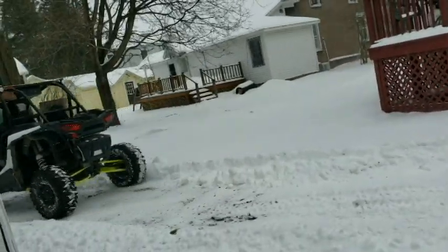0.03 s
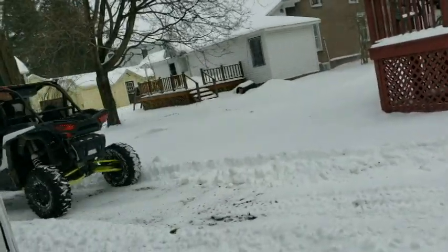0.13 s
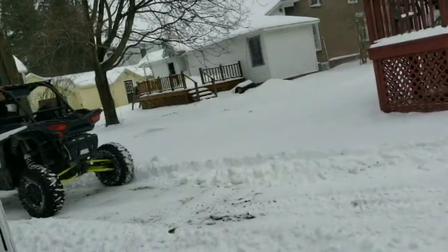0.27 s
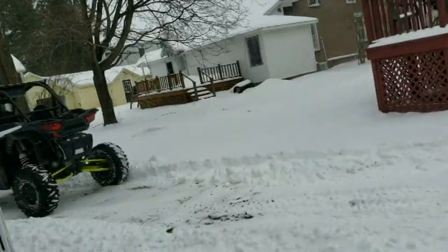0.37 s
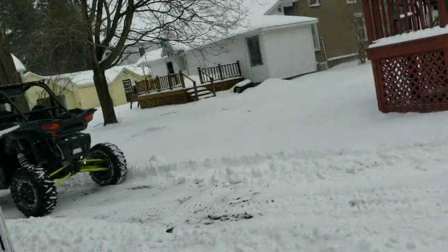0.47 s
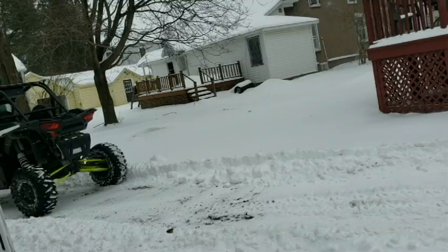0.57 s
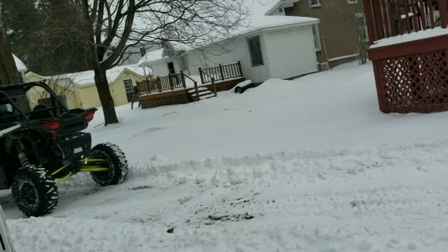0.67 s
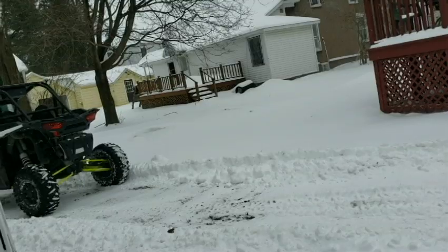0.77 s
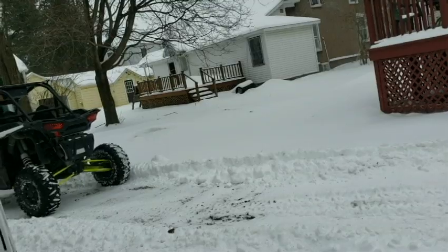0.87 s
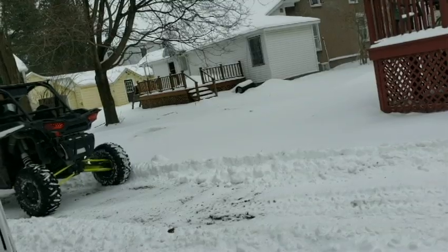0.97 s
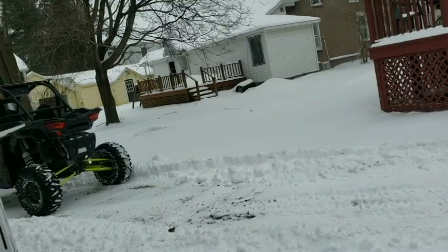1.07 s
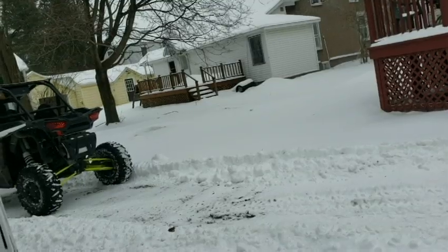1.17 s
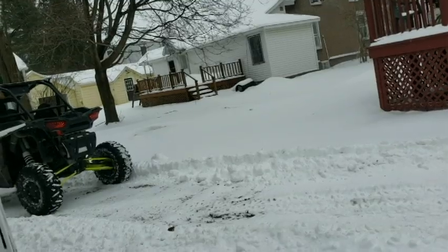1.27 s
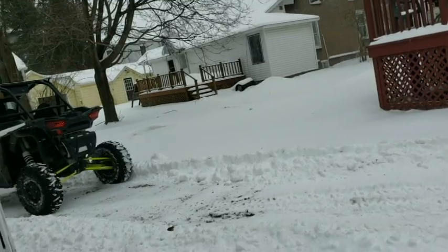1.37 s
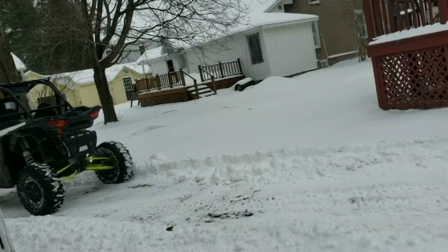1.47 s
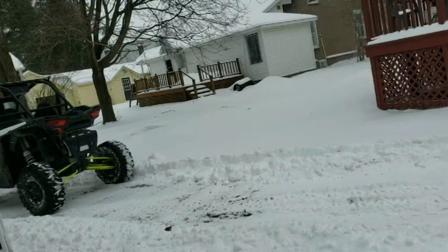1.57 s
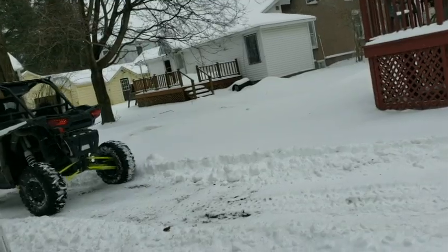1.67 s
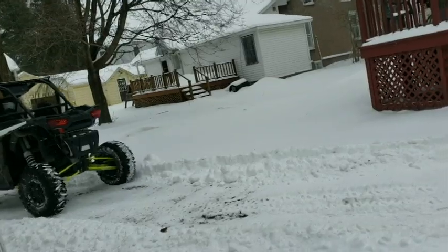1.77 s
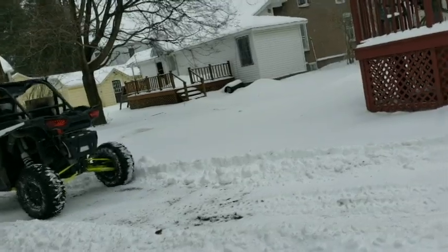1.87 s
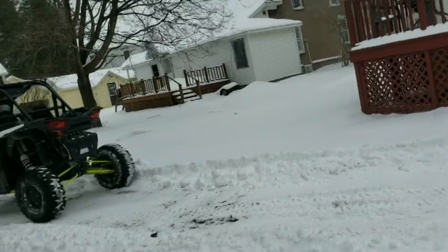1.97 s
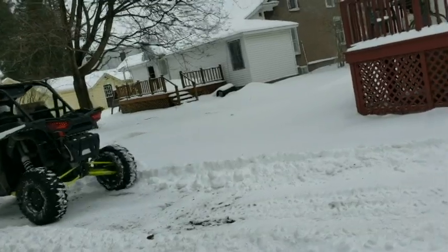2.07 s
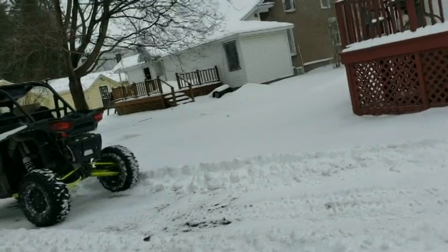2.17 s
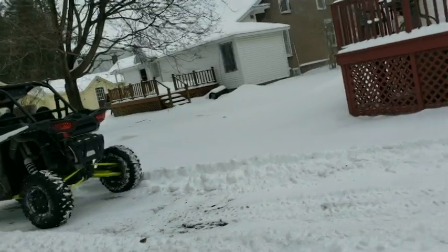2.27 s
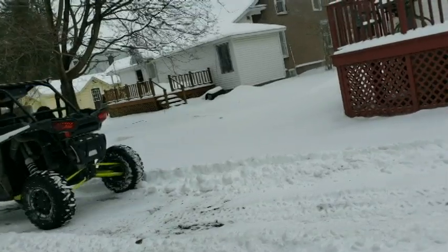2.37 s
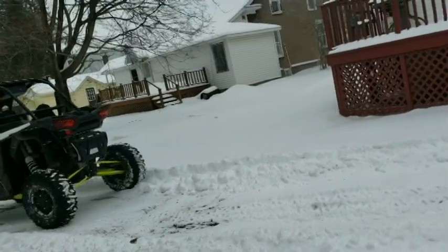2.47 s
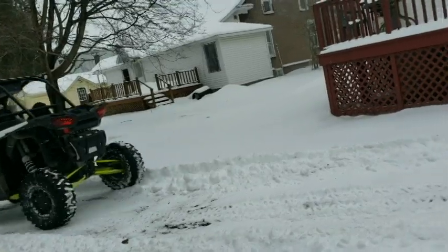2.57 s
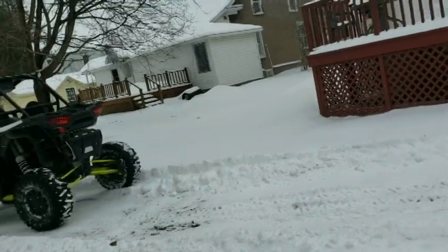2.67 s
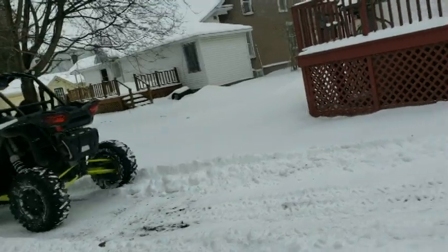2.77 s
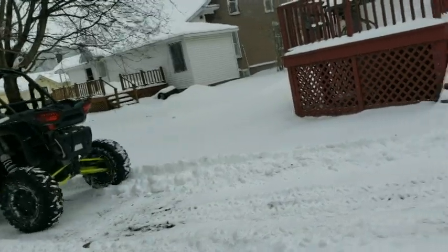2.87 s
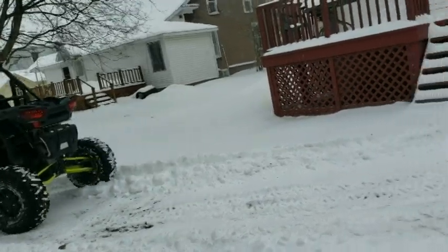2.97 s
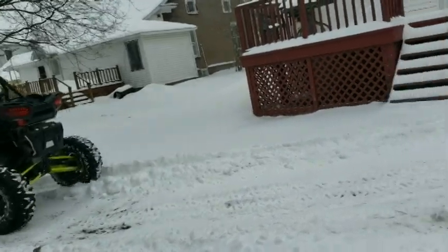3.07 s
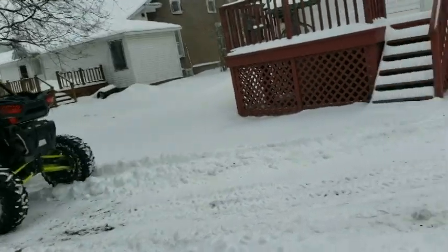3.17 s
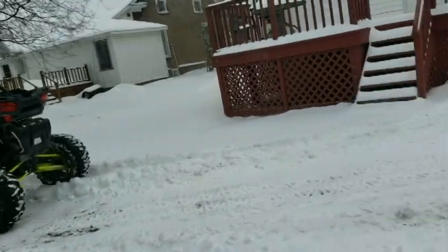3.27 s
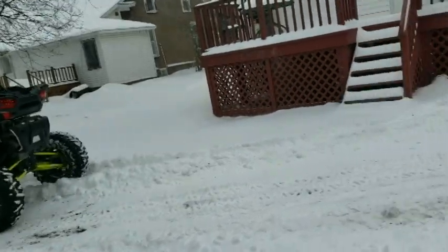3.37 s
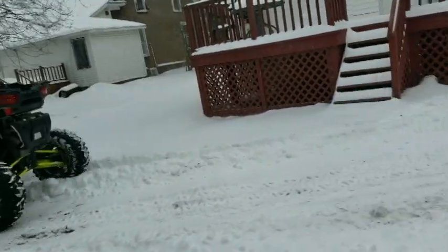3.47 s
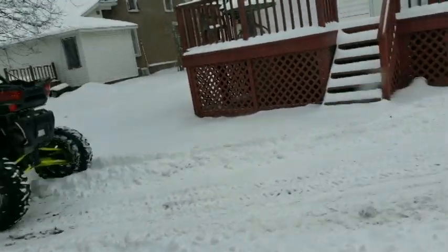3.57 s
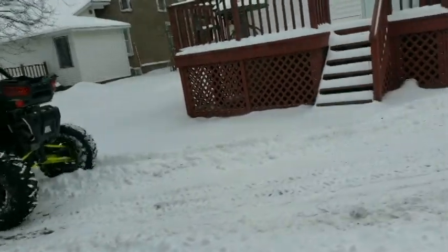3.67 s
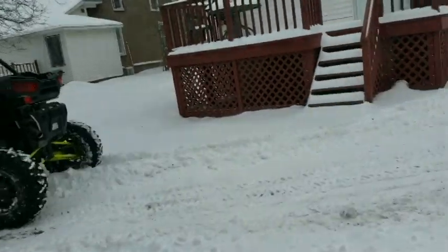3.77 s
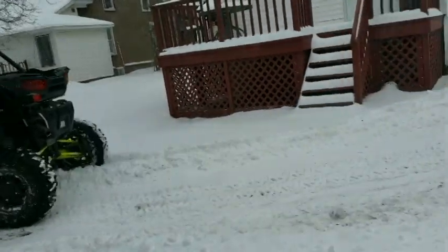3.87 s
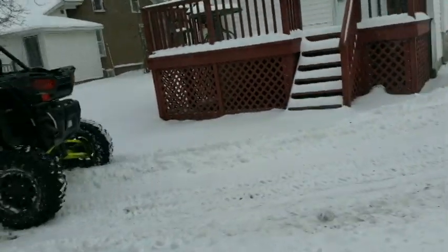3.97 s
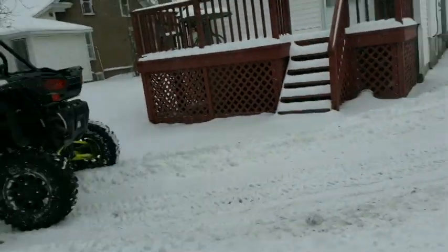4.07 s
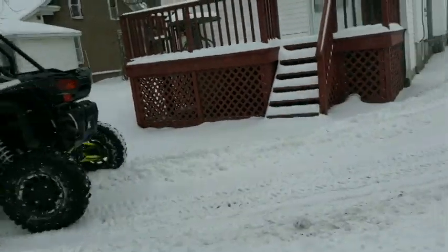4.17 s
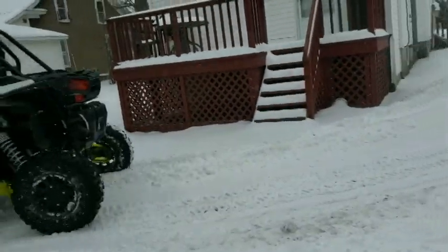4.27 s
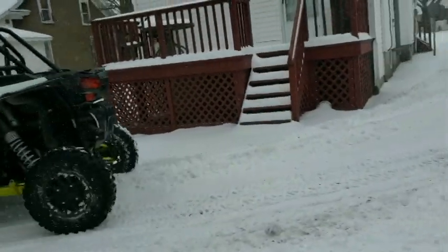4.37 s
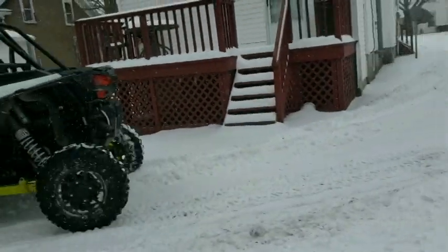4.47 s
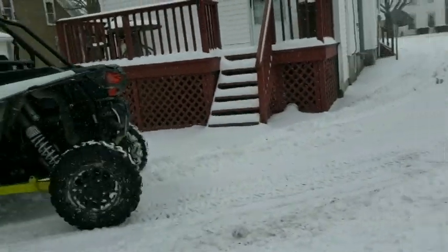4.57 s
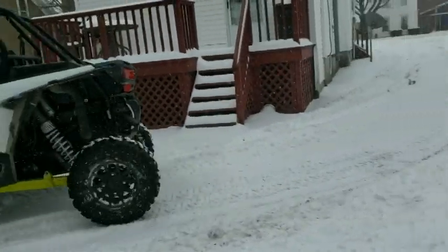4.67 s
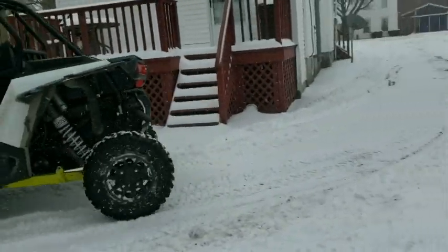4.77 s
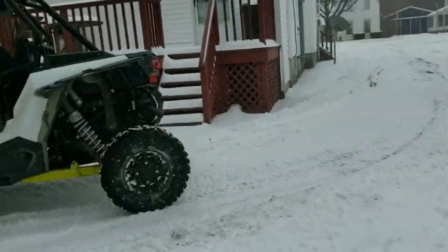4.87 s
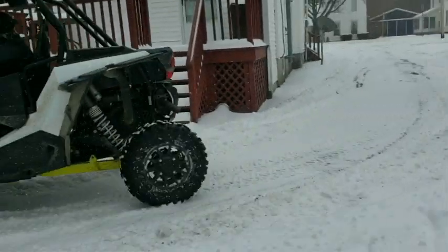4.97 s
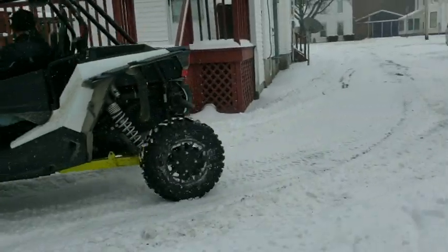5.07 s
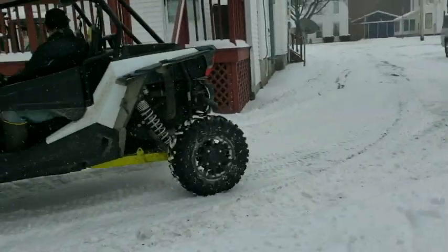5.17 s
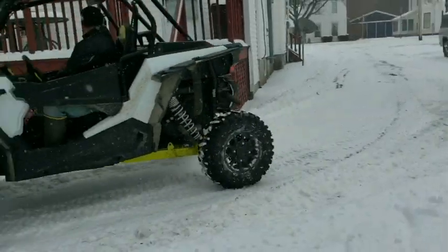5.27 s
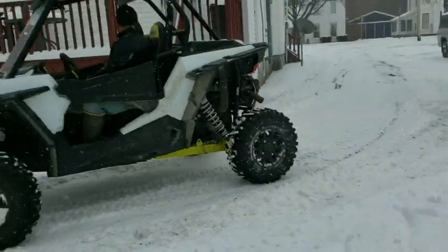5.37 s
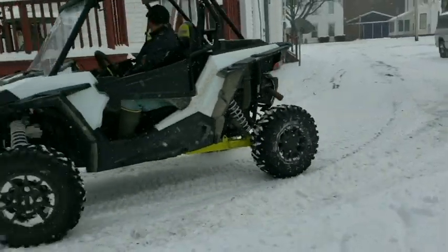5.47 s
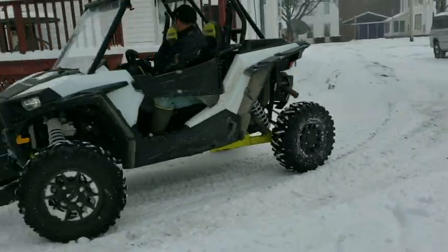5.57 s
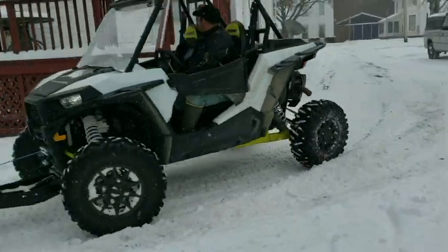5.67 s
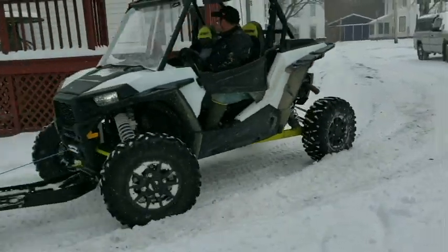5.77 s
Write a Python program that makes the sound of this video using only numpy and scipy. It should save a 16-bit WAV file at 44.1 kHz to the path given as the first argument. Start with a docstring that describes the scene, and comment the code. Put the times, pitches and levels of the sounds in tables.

```python
"""The uneven boom of an idling twin-cylinder off-road vehicle on snow, which takes throttle and moves from left to front.
Paired firing pulses ring muffler and intake modes; noise swelling with the engine cycle makes gas, case, valves and belt.
Noise bursts make the frame rattles, a sine locked to the engine the gear whine, ringing noise a singing panel,
and band noise the late rasp of tyres on snow."""
import sys
import numpy as np
from scipy import signal
from scipy.fft import rfft, irfft, next_fast_len
from scipy.io import wavfile
from scipy.ndimage import uniform_filter1d, map_coordinates

SR = 44100
rng = np.random.default_rng(int(sys.argv[2]) if len(sys.argv) > 2 else 0)


def transcribe(signal):
    """Save signal, clipped to [-1, 1], as a 16-bit WAV file at the path in sys.argv[1]."""
    frames = np.atleast_2d(signal).T
    limited = np.clip(frames, -1, 1)
    pcm = np.round(limited * 32767).astype(np.int16)
    wavfile.write(sys.argv[1], SR, pcm)


def makeup_ratio(level_db):
    """Linear amplitude ratio for a level in decibels (20 dB per factor of ten)."""
    decades = np.asarray(level_db, float) / 20
    return 10 ** decades


N = 257544

# intake and engine case levels: time_s, bark_db, then over the bark: upper_bark_db, throat_db, ring_db
INTAKE_LEVELS = [(0.0, -44, 1.5, -7, -2.5), (1.1, -56, 0.5, -2, -4), (1.27, -37, 0, -2.5, -5),
                 (1.48, -42, 6, -11, -6), (2.07, -43.5, 6, -3, 1), (2.41, -31, -5.5, -15, -10),
                 (3.03, -34, 1, -18, -8), (3.14, -33, -7, -11, -9), (3.32, -27, -7.5, -13, -7),
                 (3.81, -23.5, -1.5, -25, -9.5), (4.08, -26, 0.5, -5.5, -11), (4.6, -22, -3, -14.5, -16),
                 (4.72, -27.5, 0.5, -1.5, -13), (5.17, -30, 9.5, -3, -5), (5.64, -35, 4.5, 2.5, 1),
                 (5.84, -38.5, 7, 8.5, 3)]
# mechanical noise before each layer's make-up gain: time_s, case_db, valve_gear_db, hiss_db
MACHINE_LEVELS = [(0.0, -48.5, -54.5, -49.5), (0.93, -57.5, -61.5, -55.5), (1.48, -47.5, -50.5, -48),
                  (1.98, -48, -50, -48.5), (2.67, -43.5, -50, -43.5), (3.37, -43, -46, -42),
                  (3.99, -36.5, -41, -38.5), (4.65, -37.5, -40.5, -37.5), (5.17, -32.5, -40.5, -41),
                  (5.84, -37.5, -44.5, -45)]
# spectrum of belt hiss and bright rattle: frequency_hz, relative level_db per Hz
HISS_SPECTRUM = [(2820, -20), (4800, -22), (5900, -11), (9400, -8), (11900, 5.5), (13600, -3.5), (15100, 0),
                 (15900, -28)]
PAIR_GAP = 0.2372  # cycles from first to second firing at the tailpipe
FULL_SPEED = 34.7  # engine cycles per s


def unit(x):
    """x at rms 1."""
    return x / np.sqrt(np.mean(x ** 2) + 1e-20)


def along(points, hz):
    """Reads (Hz, value) points on a log frequency axis."""
    f, v = np.transpose(points)
    return np.interp(np.log(hz + 1), np.log(f + 1), v)


def curves(rows):
    """One value per sample for each column after the time."""
    s, *cols = np.transpose(rows)
    return [np.interp(np.arange(N) / SR, s, c) for c in cols]


def filtered(x, response):
    """x shaped by a complex response of frequency."""
    m = next_fast_len(N + SR // 2)
    return irfft(rfft(x, m) * response(np.fft.rfftfreq(m, 1 / SR)), m)[..., :N]


def resonance(modes):
    """Causal sum of (Hz, width Hz, dB) resonances; steep flanks keep the valleys dark."""
    def response(f):
        total = 0
        for k, (center, width, db) in enumerate(modes):
            bell = 1j * f * width / (center ** 2 - f ** 2 + 1j * f * width)
            total = total + (-1) ** k * makeup_ratio(db) * bell ** 2
        return total
    return response


def rush(spectrum, patchy_db):
    """Stereo noise of rms 1 with patches of random gain: a part common to both sides and a part that differs."""
    # likeness of left and right: frequency_hz, correlation
    likeness = [(100, 0.31), (300, 0.31), (700, 0.25), (2000, 0.71), (5000, 0.17), (12000, 0.033)]
    z = signal.stft(rng.standard_normal((2, N)), nperseg=512)[2]
    field = rng.standard_normal(z.shape[1:])
    field = uniform_filter1d(uniform_filter1d(field, 4, 0), 10, 1)
    pair = signal.istft(z * makeup_ratio(patchy_db * unit(field)), nperseg=512)[1][:, :N]

    def shape(hz):
        angle = np.arccos(np.clip(along(likeness, hz), 0, 1)) / 2
        return makeup_ratio(along(spectrum, hz)) * [np.cos(angle), np.sin(angle)]
    mid, side = filtered(pair, shape)
    return unit(np.array([mid + side, mid - side]))


def engine_speed():
    """Engine cycles per second: a low idle, then a climb with the throttle."""
    # time_s, speed in engine cycles per s
    speed_points = [(0.0, 17.89), (0.15, 15.85), (0.3, 15.14), (0.45, 11.21), (0.6, 11.29), (0.8, 9.65),
                    (1.0, 10.77), (1.1, 10.17), (1.3, 18.3), (1.4, 18.44), (1.8, 18.2), (2.1, 18.31),
                    (2.3, 21.19), (2.45, 21.78), (2.7, 22.98), (3.15, 24.55), (3.25, 26.4), (3.6, 30.63),
                    (4.0, 33.46), (4.4, 34.72), (4.6, 34.08), (4.8, 32.84), (5.0, 32.56), (5.4, 31.2),
                    (5.6, 31.8), (5.84, 31.09)]
    return curves(speed_points)[0]


def swell(cycle, depth, lag):
    """Gain that rises and falls once per engine cycle, highest at lag (cycles)."""
    return 1 + depth * np.cos(2 * np.pi * (cycle - lag))


def firings(cycle, gap, second_db, back_db, scatter_db, jitter_ms):
    """Two firings and a weak back-pulse a cycle; slow running scatters them more and strengthens the back-pulse."""
    half_gap = 0.56  # cycles; the back-pulse comes about a crank turn after the first firing
    first = np.arange(np.floor(cycle[0]), cycle[-1])
    phase = first[:, None] + [0, gap, half_gap]
    where = np.interp(phase, cycle, np.arange(N))
    chance = rng.standard_normal((len(first), 6))
    rate = engine_speed()[where.astype(int)]
    idle = (20 / rate) ** 1.65  # unevenness, 1 at 20 cycles per s
    size = makeup_ratio([0, second_db, back_db] + scatter_db * idle * chance[:, :3]) / np.sqrt(rate)
    size = size * np.where([0, 0, 1], np.minimum(idle, 3) / 3, 1)
    size = size * (phase > cycle[0] - 0.1) * (phase < cycle[-1])
    where = where + jitter_ms * SR / 1000 * idle * chance[:, 3:]
    where = np.clip(where, 0, N - 1).astype(int)
    return np.bincount(where.ravel(), size.ravel(), N)


def voiced(pulses, modes, db):
    """Pulses rung through modes; a moving level db drives the pulses, so each tail rings on."""
    ring = resonance(modes)
    return filtered(pulses * makeup_ratio(db), ring) / np.std(filtered(pulses, ring))


def exhaust(cycle):
    """Firing pulses ring three low muffler modes; the unloaded engine adds a deep thud."""
    # muffler levels: time_s, middle_db, then over the middle: low_db, upper_db
    boom_levels = [(0.0, -14, -23, -24), (0.08, -21.5, -3, 2.5), (0.29, -20, -6, -20),
                   (1.12, -20.5, -9.5, -46), (1.27, -7.5, -11, -14), (1.4, -21, 0, -0.5),
                   (2.07, -23.5, 3, 4.5), (2.25, -11, -8.5, -9), (2.55, -14, -22, -6.5),
                   (3.15, -13, -5, -4.5), (3.3, -6.5, -46, -10.5), (3.55, -16.5, -52, 2),
                   (4.11, -15.5, -38, -30), (4.4, -21, -11, -16), (4.75, -26, 4.5, -9.5),
                   (5.25, -39.5, 15.5, 18.5), (5.68, -30.5, 9, 4.5), (5.84, -40.5, 16, 14)]
    # low, middle and upper muffler mode: frequency_hz, width_hz
    muffler_modes = [(80, 20), (120, 32), (158, 45)]
    pulses = firings(cycle, PAIR_GAP, second_db=-2.5, back_db=-6, scatter_db=0.7, jitter_ms=0.25)
    boom_db, low_db, upper_db = curves(boom_levels)
    levels = boom_db + low_db, boom_db, boom_db + upper_db
    boom = 0
    for k, ((hz, width), db) in enumerate(zip(muffler_modes, levels)):
        boom = boom + (-1) ** k * voiced(pulses, [(hz, width, 0)], db)
    throttle_s = 1.15  # the thud's pulses end as the throttle opens
    unloaded = pulses * (np.arange(N) < throttle_s * SR)
    thud = voiced(unloaded, [(44, 19, 0)], -37) * np.sqrt(throttle_s * SR / N)
    return boom + thud


def intake(cycle):
    """Gulps of the two cylinders ring the airbox and engine case, each mode group struck at its own lead."""
    # mode groups bark, upper bark, throat, ring: frequency_hz, width_hz, level_db within the group
    airbox_modes = [
        [(360.3, 36.5, 0)],
        [(421.6, 31.8, 0), (485, 46, -11)],
        [(266.5, 86, 0)],
        [(519, 70, 0.5), (615, 54, 0)],
    ]
    # lead of each group ahead of the tailpipe: lead in cycles
    group_leads = [0.137, 0.1442, 0.3348, 0.0608]
    bark_db, *over_db = curves(INTAKE_LEVELS)
    total = 0
    for lead, modes, db in zip(group_leads, airbox_modes, [0, *over_db]):
        gulps = firings(cycle + lead, 0.2471, second_db=4, back_db=-3, scatter_db=0.9, jitter_ms=0.14)
        total = total + voiced(gulps, modes, bark_db + db)
    return total


def gas_rush(cycle):
    """Low gas noise swells once a cycle and sinks under the pulses as speed rises."""
    # frequency_hz, relative level_db per Hz
    puff_spectrum = [(30, -13), (60, -3), (130, 5), (200, -7.5), (400, -7), (700, -12.5), (1000, -51.5)]
    bark_db, _, _, ring_db = curves(INTAKE_LEVELS)
    fade_db = 0.27 * engine_speed()  # dB per cycle per s
    level = makeup_ratio(bark_db + ring_db + 13.5 - fade_db)
    return level * swell(cycle, 0.15, 0.3) * rush(puff_spectrum, patchy_db=4)


def block_shake(cycle):
    """The rocking block as a sine once a cycle, weaker below full speed."""
    full_db, least_db, slope = -28.5, -52, 1.9  # rms dB, rms dB, dB per cycle per s
    shake_db = np.clip(full_db + slope * (engine_speed() - FULL_SPEED), least_db, full_db)
    return np.sqrt(2) * makeup_ratio(shake_db) * np.sin(2 * np.pi * (cycle + 0.44))


def case_ring(cycle):
    """Engine-case noise swells each cycle; a part struck by the firings grows with speed."""
    # frequency_hz, relative level_db per Hz
    case_spectrum = [(600, -72), (800, -3.5), (1000, 0), (1120, -1), (1230, -2.5), (1400, -8), (1550, -6),
                     (2000, -24)]
    case_modes = [(753, 160, 3.5), (1008, 160, 4.5), (1212, 180, -1), (1315, 55, 5.5), (1715, 450, -17)]
    knocks = firings(cycle - 0.1, PAIR_GAP, second_db=-9, back_db=-15, scatter_db=1.5, jitter_ms=0.06)
    struck = unit(filtered(knocks, resonance(case_modes)))
    share = 0.75 * engine_speed() / FULL_SPEED
    steady = swell(cycle, 0.22, 0.61) * rush(case_spectrum, patchy_db=2.1)
    return makeup_ratio(curves(MACHINE_LEVELS)[0] + 3.5) * (np.sqrt(1 - share ** 2) * steady + share * struck)


def loose_clatter():
    """Grainy gain of loose parts: rectified noise below 250 Hz over a steady floor."""
    return 1 + 1.85 * np.abs(filtered(rng.standard_normal(N), lambda hz: hz < 250))


def valve_gear(cycle, clatter):
    """Valve-gear noise, grainy with clatter and swelling each cycle."""
    # frequency_hz, relative level_db per Hz
    valve_spectrum = [(820, -13.5), (1400, -3), (1710, -0.5), (1850, -1), (2310, -3.5), (2750, -5.5),
                      (3000, -5.5), (3300, -8.5), (4300, -13), (5200, -19.5), (6200, -42)]
    noise = clatter * swell(cycle, 0.11, 0.42) * rush(valve_spectrum, patchy_db=1.5)
    return makeup_ratio(curves(MACHINE_LEVELS)[1] + 9) * unit(noise)


def belt_hiss(cycle, clatter):
    """Treble hiss of the belt, sharing the clatter and swelling slightly each cycle."""
    noise = clatter * swell(cycle, 0.073, 0.45) * rush(HISS_SPECTRUM, patchy_db=2.7)
    return makeup_ratio(curves(MACHINE_LEVELS)[2] + 2) * unit(noise)


def gear_whine(cycle):
    """A gear tone locked to the engine, pulsing once a cycle."""
    # time_s, level_db (rms before the pulsing)
    whine_levels = [(4.7, -62), (4.9, -30.5), (5.1, -32), (5.3, -37.5), (5.5, -33), (5.7, -41)]
    tone = np.sin(2 * np.pi * 38 * cycle)  # 38 periods per engine cycle
    return np.sqrt(2) * makeup_ratio(curves(whine_levels)[0]) * swell(cycle, 0.51, 0.3) * tone


def rattles():
    """Short bursts of dull and bright noise where the frame knocks."""
    # start_s, level_db (before attack and burst trim), dull part over it_db
    knock_times = [(0.6983, -27.5, -10.5), (0.7187, -36, -17), (0.8395, -35, -5), (1.1707, -34, -17),
                   (1.215, -30.5, -7), (1.2646, -25.5, -9), (1.284, -31, -17), (1.323, -28, -10),
                   (1.348, -29.5, 5), (1.643, -32.5, 0), (1.978, -25, -15), (2.1998, -33, -10)]
    # dull part: frequency_hz, relative level_db per Hz
    snap_spectrum = [(600, -30), (1200, -4.5), (3000, 0), (6000, -8), (10000, -14), (15000, -30)]
    bright, dull = np.zeros(N + SR), np.zeros(N + SR)
    t = np.arange(SR // 8) / SR
    attack = 1 - np.exp(-t / 0.00082)
    for s, db, dull_db in knock_times:
        start = round(s * SR)
        # 60 dB decay in 0.13 s bright, 0.076 s dull
        bright[start:][:len(t)] += attack * makeup_ratio(db - 9.5 - 60 * t / 0.13)
        dull[start:][:len(t)] += attack * makeup_ratio(db + dull_db - 2.5 - 60 * t / 0.076)
    return dull[:N] * rush(snap_spectrum, patchy_db=1), bright[:N] * rush(HISS_SPECTRUM, patchy_db=1)


def singing_panel():
    """A panel sings briefly as the speed sweeps up: narrow noise under a rising and falling arch."""
    start_s, end_s = 3.4, 3.9
    arch = np.sin(np.pi * np.clip((np.arange(N) / SR - start_s) / (end_s - start_s), 0, 1))
    ring = unit(filtered(rng.standard_normal(N), resonance([(1570, 45, 0)])))
    return makeup_ratio(-40) * arch * ring


def tyre_rasp(cycle):
    """Tyres on snow: band noise fading in late and swelling with the engine cycle."""
    # frequency_hz, relative level_db per Hz
    rasp_spectrum = [(1200, -26), (1500, -11), (2100, 1), (2600, -1), (2900, -25)]
    fade_in = np.interp(np.arange(N) / SR, [5.12, 5.4], [0, 1])
    return makeup_ratio(-42) * fade_in * swell(cycle, 0.35, 0.15) * rush(rasp_spectrum, patchy_db=3)


def sideways_offset():
    """1 while the vehicle is on the left, falling to 0.14 as it swings to the front."""
    swing_s, lasts_s, kept = 4.75, 1, 0.14
    swing = np.clip((np.arange(N) / SR - swing_s) / lasts_s, 0, 1)
    return 1 - (1 - kept) * swing


def placed(low, high):
    """Sets the vehicle to the left by a right-side delay and a left-right tone tilt, both easing with the swing."""
    # frequency_hz, left over right_db
    left_tilt = [(60, 1), (110, 3), (200, 2.5), (380, 1.0), (700, 1.5), (1290, -1), (2380, 0.5),
                 (4400, 3.5), (8120, 4), (15000, 3.5)]
    aside = sideways_offset()

    def late(x, ms):
        return map_coordinates(x, [np.arange(N) - ms * aside * SR / 1000], order=3, mode="nearest")
    right = late(low[1], 0.26) + late(high[1], 0.496)  # ms at full offset
    pair = np.array([low[0] + high[0], right])
    tilted = filtered(pair, lambda hz: makeup_ratio(along(left_tilt, hz) * [[0.5], [-0.5]]))
    return aside * tilted + (1 - aside) * pair


def scene():
    """The vehicle starts on the left of the listener and ends up nearly in front."""
    cycle = np.cumsum(engine_speed()) / SR + 0.1176
    clatter = loose_clatter()
    dull, bright = rattles()
    engine = exhaust(cycle) + intake(cycle) + gas_rush(cycle) + block_shake(cycle)
    body = case_ring(cycle) + valve_gear(cycle, clatter) + tyre_rasp(cycle)
    tones = gear_whine(cycle) + singing_panel()
    low = engine + body + tones + dull
    high = belt_hiss(cycle, clatter) + bright
    return placed(low, high)


def roll_off(x):
    """The treble ends steeply here."""
    return signal.sosfilt(signal.butter(12, 16580, fs=SR, output="sos"), x)


def record(dry):
    """A soft ceiling rounds off the peaks of the finished mix."""
    ceiling = 0.94  # of full scale
    mix = dry / (1 + np.abs(dry / ceiling) ** 8) ** (1 / 8)
    return roll_off(mix)


dry = scene()
out = record(dry)
transcribe(out)
```